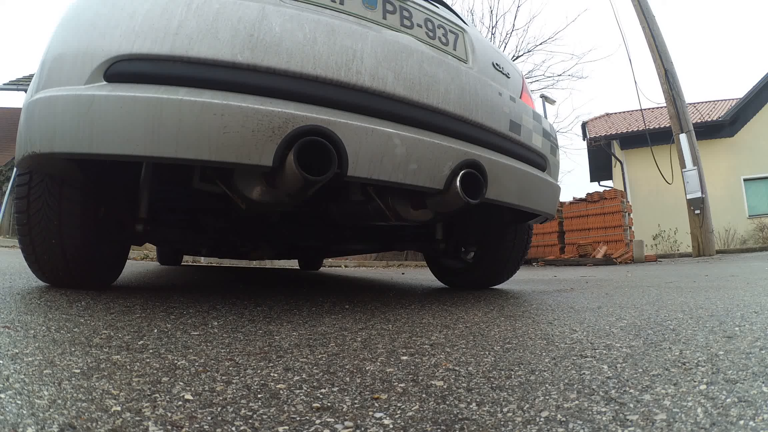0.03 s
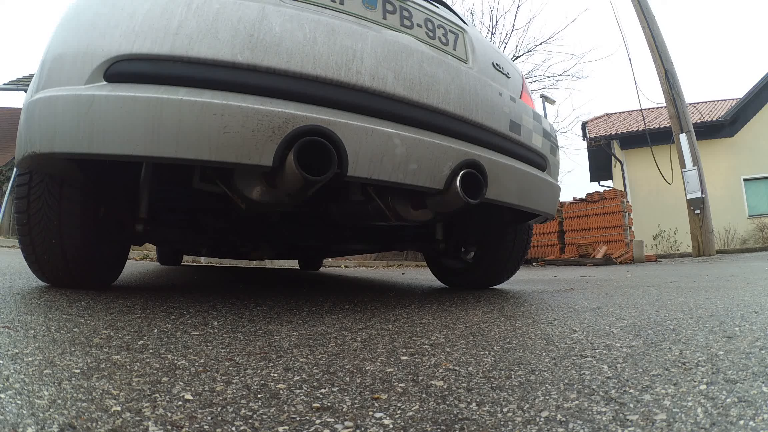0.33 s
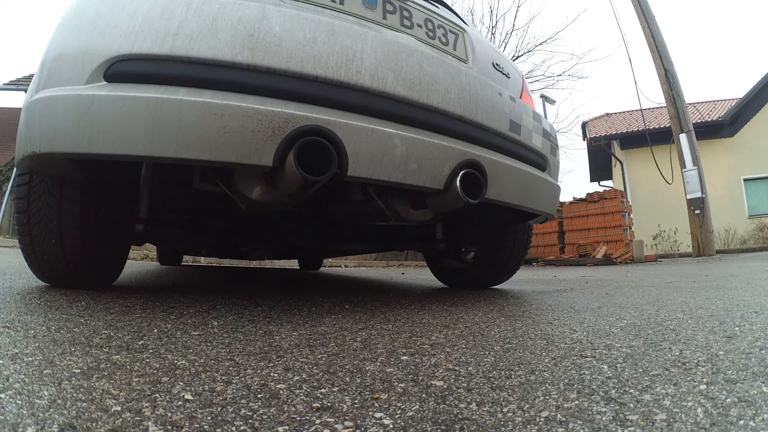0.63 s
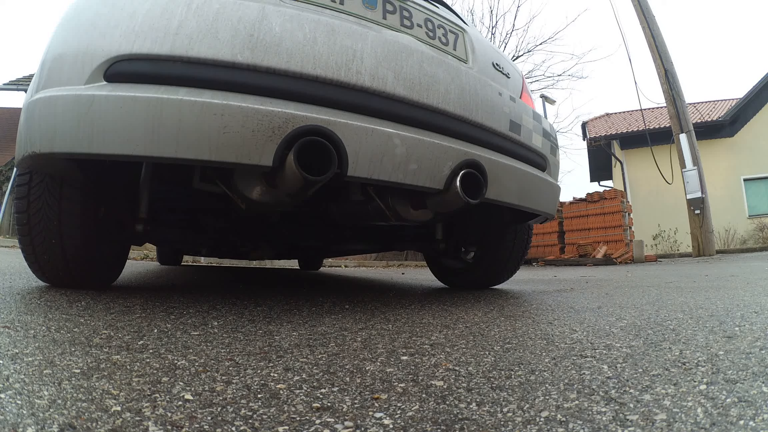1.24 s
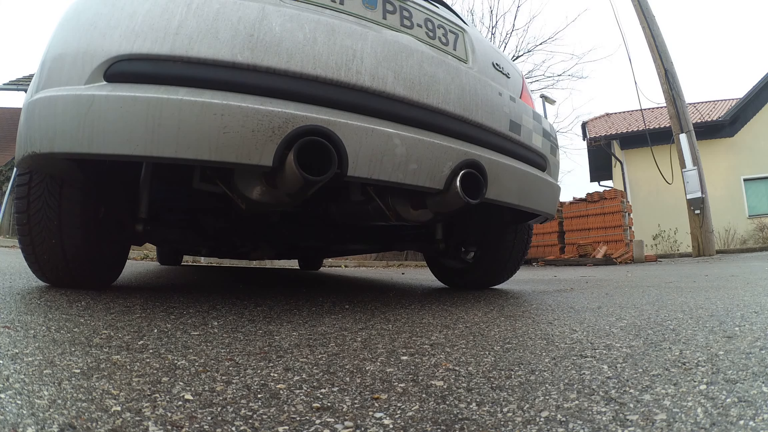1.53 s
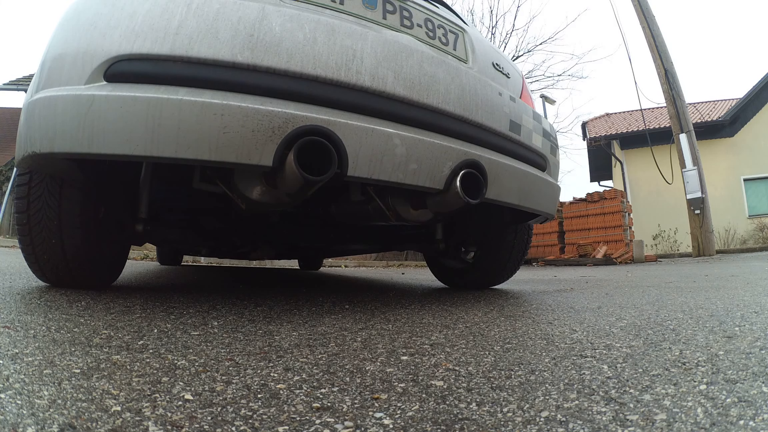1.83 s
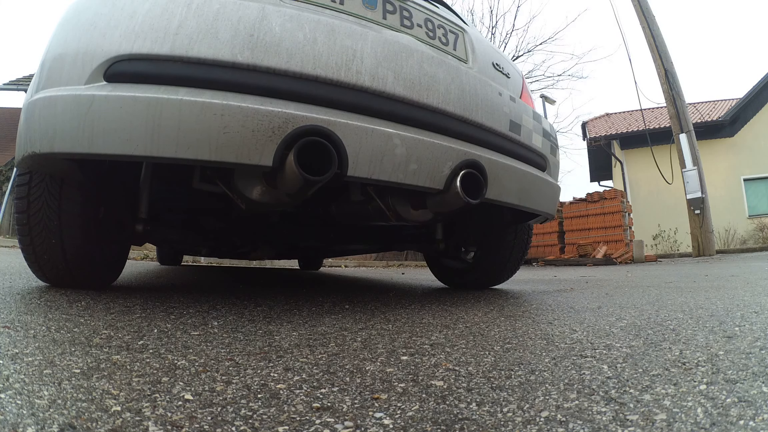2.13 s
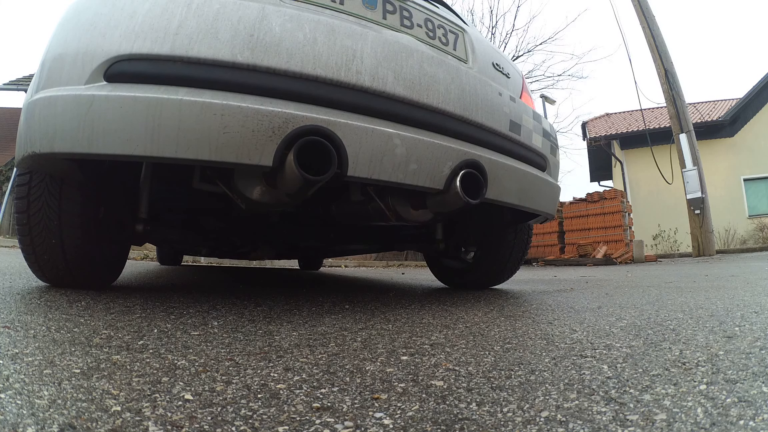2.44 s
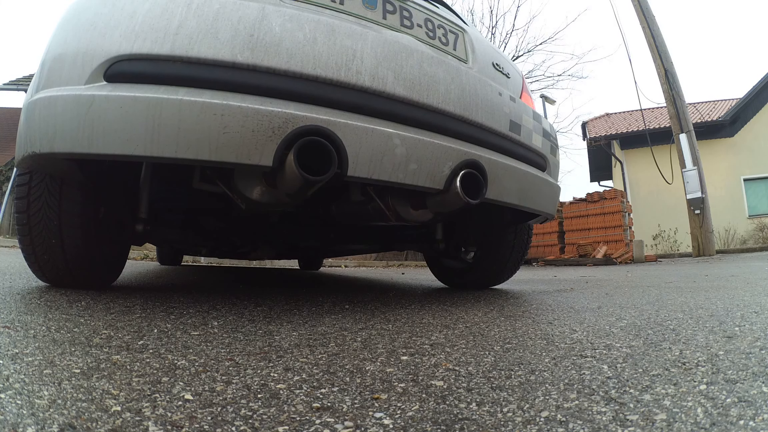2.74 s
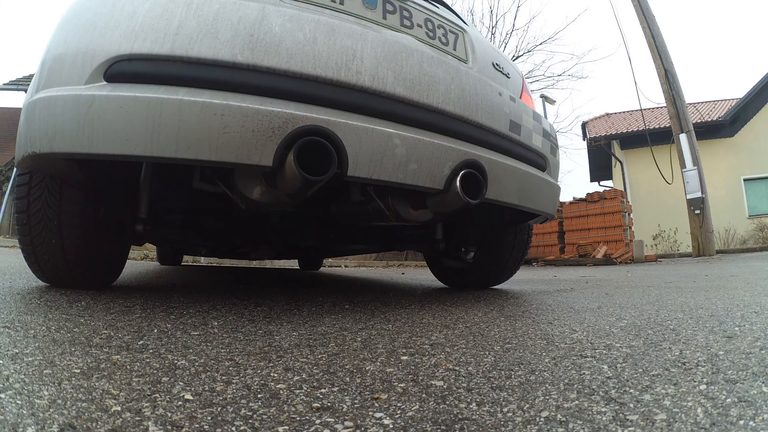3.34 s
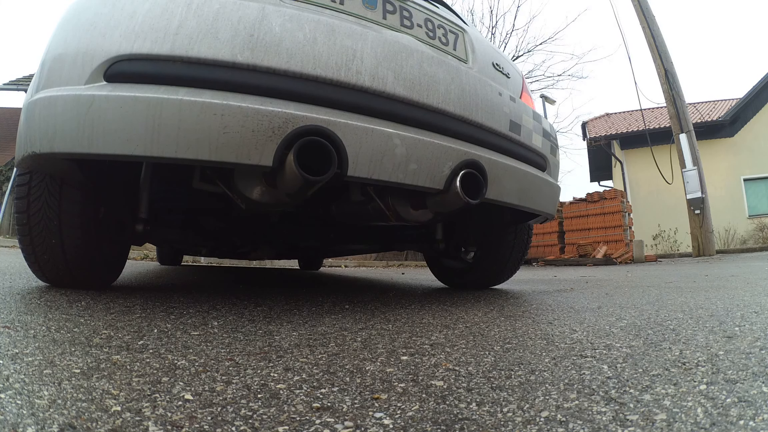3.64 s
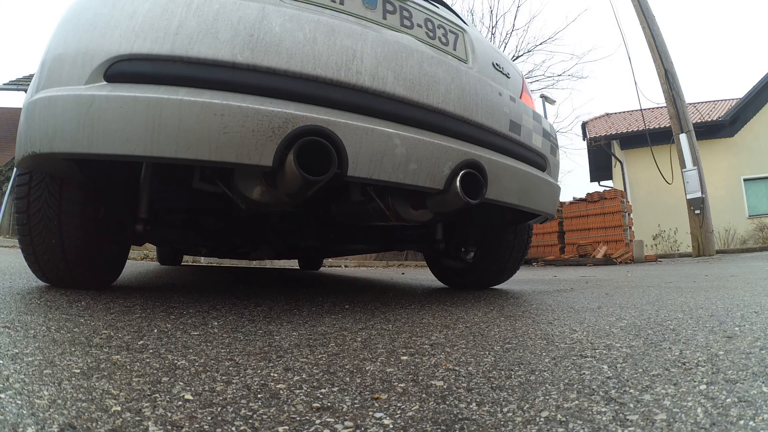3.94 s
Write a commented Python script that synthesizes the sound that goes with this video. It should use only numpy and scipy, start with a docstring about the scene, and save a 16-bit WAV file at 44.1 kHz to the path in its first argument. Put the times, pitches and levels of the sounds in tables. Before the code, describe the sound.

A car starts up, heard close to its exhaust, flaring before a deep fast idle.

```python
"""A four-cylinder petrol car starts from cold, heard from the asphalt just behind its twin tailpipes.
First, faint electrical interference ticks in the recorder. From about 1.5 s the starter's teeth drive
the housing into resonance and unfired cylinders chuff. At 2.15 s the engine catches: gas pulses excite
the silencer and pipes, and the first firings overload the recorder. The revs flare, stumble briefly as
the throttle closes, and settle into a booming fast idle."""
import sys
import numpy as np
from scipy import signal
from scipy.io import wavfile

SR = 44100
rng = np.random.default_rng(int(sys.argv[2]) if len(sys.argv) > 2 else 0)


def unload_audio(sound):
    """Save the sound as a 16-bit wav file, at the path given as the first command line argument."""
    columns = np.transpose(np.atleast_2d(sound))
    # keep every value between -1 and 1, then stretch to whole-number steps
    steps = np.round(np.clip(columns, -1, 1) * 32767)
    wavfile.write(sys.argv[1], SR, steps.astype(np.int16))


N = 176400
TIME = np.arange(N) / SR
FIRST_FIRING_S, FLARE_END_S = 2.151, 2.72


def amp(db):
    """Decibels to amplitude ratio."""
    return 10 ** (np.asarray(db) / 20)


def unit(x):
    """Normalisation to rms 1."""
    return x / np.sqrt(np.mean(x ** 2) + 1e-20)


def idle_rms(x):
    """Rms fluctuation over the last second, when the engine idles."""
    return np.std(x[-SR:])


def curve(table, column=1, t=TIME):
    """Linear interpolation of one table column over time."""
    rows = np.array(table)
    return np.interp(t, rows[:, 0], rows[:, column])


def response(spectrum, size=16384):
    """Minimum-phase impulse response: the phase is the Hilbert transform of the log gain."""
    hz, db = np.transpose(spectrum)
    bin_hz = abs(np.fft.fftfreq(size, 1 / SR))
    log_gain = np.log(amp(np.interp(np.log(bin_hz + 1), np.log(hz + 1), db)))
    return np.fft.ifft(np.exp(np.conj(signal.hilbert(log_gain)))).real[:size // 2]


def colour(x, spectrum):
    """Linear filtering by convolution."""
    return signal.fftconvolve(x, response(spectrum))[:N]


def noise(spectrum):
    """Filtered white noise of rms 1."""
    return unit(colour(rng.standard_normal(N), spectrum))


def wander(per_s):
    """Random modulation: straight lines between Gaussian values."""
    knots = rng.standard_normal(4000)
    return np.interp(TIME * per_s, np.arange(len(knots)), knots)


def impulses(times, sizes):
    """Impulse train with the given times and sizes."""
    samples = np.clip(np.round(np.asarray(times) * SR).astype(int), 0, N)
    return np.bincount(samples, sizes, N + 1)[:N]


def add(mix, s, sound):
    """Superposition of a sound starting at s seconds."""
    part = mix[round(s * SR):][:len(sound)]
    part += sound[:len(part)]


# Engine speed. Each row: time in seconds, firings per second.
FIRING_RATE = [(2.16, 18.27), (2.23, 37.94), (2.3, 51.12), (2.38, 61.5), (2.48, 65.54), (2.56, 65.28),
               (2.63, 53.66), (2.69, 52.59), (2.76, 43.85), (2.9, 44.52), (3.1, 45.27), (3.3, 46.17),
               (3.5, 46.06), (3.66, 44.17), (4.0, 45.78)]
# Cylinders in firing order. Each row: boom in dB, rasp in dB, extra travel to the tailpipe in ms.
CYLINDERS = [(0.9, -0.5, 0.089), (0, 0.5, 0.84), (1.1, -5.5, 0.11), (0.24, 0.5, 1.05)]
# Exhaust pulse strength. Each row: time in seconds, level in dB.
PULSE_LEVEL = [(2.15, -3), (2.2, -3.5), (2.24, -3.5), (2.3, -4), (2.36, -9.5), (2.5, -9), (2.63, -10.5),
               (2.7, -10.5), (2.8, -9.5), (3.4, -10.5), (4, -9.5)]
# Uneven combustion. Each row: time in seconds, spread between firings in dB.
PULSE_SPREAD = [(2.2, 1), (2.32, .5), (2.53, .4), (2.57, 1.5), (2.74, 1.5), (2.82, .3), (4, .25)]
# Weak burns as the throttle closes. Each row: time in seconds, level in dB against a normal firing.
STUMBLES = [(2.555, -3), (2.586, -2), (2.657, -9), (2.676, -3.5)]


def exhaust(jitter_ms=0.18, rasp_spread_db=0.1, puff_decay_cycles=0.4):
    """Periodic excitation: each firing thumps the silencer, rings the pipes and releases a puff of gas."""
    running = np.clip((TIME - FIRST_FIRING_S) * 200, 0, 1)
    rate = np.maximum(curve(FIRING_RATE), 1)
    cycles = np.cumsum(rate * (TIME >= FIRST_FIRING_S)) / SR  # one cycle per firing
    firings = np.arange(int(cycles[-1]) + 1)
    firing_s = np.searchsorted(cycles, firings, side="right") / SR
    boom_scatter, time_scatter, rasp_scatter = rng.standard_normal((200, 3))[firings].T
    boom_db, rasp_db, travel_ms = np.array(CYLINDERS)[firings % len(CYLINDERS)].T
    pulse_db = curve(PULSE_LEVEL, t=firing_s) + boom_db + boom_scatter * curve(PULSE_SPREAD, t=firing_s)
    for s, db in STUMBLES:
        pulse_db[np.argmin(abs(firing_s - s))] += db
    arrival_s = firing_s + (travel_ms + jitter_ms * time_scatter) / 1000
    fronts = impulses(arrival_s, amp(rasp_db + rasp_spread_db * rasp_scatter))
    puff = np.exp(-(cycles % 1) / puff_decay_cycles)
    tones = silencer_boom(cycles, rate, pulse_db) + pipe_tones(cycles)
    return tones + pipe_rasp(fronts, puff, running) + running * gas_hiss(puff)


# Silencer response. Each row: frequency in Hz, relative gain in dB.
SILENCER = [(10, -36.5), (22, -15), (36, 1.5), (46, 2), (64, 0), (75, 2), (92, -17), (130, -18.5),
            (160, -10), (183, -10), (200, -15), (228, -36.5), (300, -47.5), (600, -95.5)]


def silencer_boom(cycles, rate, pulse_db, pulse_cycles=0.2):
    """Acoustic filtering: the silencer passes only the low harmonics of the blowdown pulses."""
    blowdown = rate * np.sin(np.pi * np.minimum(cycles % 1 / pulse_cycles, 1)) ** 2
    pulses = blowdown * amp(pulse_db)[cycles.astype(int)]
    return colour(pulses, SILENCER) / idle_rms(colour(blowdown, SILENCER))


# Low and high pipe resonances. Each row: frequency in Hz, relative gain in dB.
LOW_PIPE = [(130, -69), (215, -18.5), (260, -5), (295, -8.5), (340, -8.5), (388, 1.5), (420, -5.5),
            (480, -4.5), (525, -18.5), (600, -22), (700, -65), (1200, -49)]
HIGH_PIPE = [(400, -30.5), (570, -9.5), (650, -6.5), (705, -12), (765, 0.5), (815, 0), (850, -7),
             (940, -12), (1020, -12), (1130, -22.5), (1350, -23.5), (1600, -33.5), (2600, -55), (5000, -84)]
# Pipe rasp. Each row: time in seconds, low pipe level in dB, high pipe level in dB.
RASP_LEVEL = [(2.15, -51, -52), (2.172, -46, -43), (2.25, -24.5, -26), (2.36, -28.5, -34.5),
              (2.49, -29.5, -31.5), (2.55, -26.5, -34.5), (2.595, -29.5, -42), (2.645, -29.5, -28),
              (2.675, -30, -37.5), (2.72, -38, -47.5), (2.86, -34, -40.5), (3, -36, -45), (3.4, -35, -45),
              (3.7, -39, -47), (4, -33.5, -44)]


def pipe_rasp(fronts, puff, running, steady_flow=1.3):
    """Air-column resonance: pressure fronts and turbulent gas ring the pipes."""
    out = np.zeros(N)
    for pipe, turbulence_db, column in (LOW_PIPE, 2.5, 1), (HIGH_PIPE, 5, 2):
        gas = (steady_flow + puff) * rng.standard_normal(N)
        turbulence = amp(turbulence_db) * running * gas / idle_rms(gas)
        ringing = colour(fronts / idle_rms(fronts) + turbulence, pipe)
        out += amp(curve(RASP_LEVEL, column)) * ringing / idle_rms(ringing)
    return out


# Engine orders. Each row: approximate multiple of the firing rate, idle level in dB, full flare in dB.
ORDERS = [(4, -71, -26.5), (5, -50, -37), (6, -47.5, -23.5), (7, -52, -42), (7.5, -56, -46),
          (8.5, -42, -36), (9.25, -50, -36), (10.5, -48, -41), (12, -55.5, -36.5), (13, -53, -42),
          (14.5, -55.5, -52), (15.5, -70, -41), (16.69, -51.5, -60), (17.63, -54, -46), (22.56, -58, -62)]
# How freely the pipes sing in the flare. Each row: time in seconds, share of full amplitude from 0 to 1.
SINGING = [(2.3, 0), (2.41, 0.03), (2.445, 0.73), (2.5, 0.89), (2.545, 0.4), (2.57, 0)]


def pipe_tones(cycles, waver_rad=0.25):
    """Harmonics of the four-firing cycle follow the engine speed, loudest at the top of the flare."""
    singing = curve(SINGING)
    idling = np.interp(TIME, [SINGING[-1][0], FLARE_END_S], [0, 1])
    out = np.zeros(N)
    for multiple, idle_db, flare_db in ORDERS:
        order = round(multiple * 4) / 4
        phase = 2 * np.pi * order * cycles + waver_rad * wander(per_s=9)
        out += (idling * amp(idle_db) + singing * amp(flare_db)) * np.sqrt(2) * np.sin(phase)
    return out


# Gas hiss under load and at idle. Each row: frequency in Hz, relative level in dB.
LOAD_HISS = [(700, -25), (1150, 2), (1700, -3), (2400, -4.5), (2900, 2.5), (3900, 1), (4900, -1),
             (7000, -1.5), (8500, -3), (10100, -10), (12200, -12), (15000, -18), (16500, -36)]
IDLE_HISS = [(700, -20), (1100, 2.5), (1380, 7.5), (1480, 0.5), (1600, 4.5), (1800, -0.5), (2100, 2.5),
             (2380, -5.5), (2800, 0.5), (3100, -3), (3900, -2), (4500, -5.5), (5600, -4.5), (7000, -7),
             (8500, -10.5), (10000, -15), (15000, -24.5)]
# Strength of the hiss. Each row: time in seconds, level in dB.
HISS_LEVEL = [(2.15, -42), (2.172, -36.5), (2.28, -33), (2.36, -39), (2.43, -42), (2.52, -41.5), (2.6, -45),
              (2.67, -47), (2.77, -47.5), (2.85, -44.5), (2.95, -48.5), (3.15, -48.5), (3.35, -49.5),
              (3.7, -50), (4, -49)]


def gas_hiss(puff, pulsing=0.15, flicker_db=1.44):
    """Turbulent flow noise pulses with each puff and changes colour as the load falls."""
    load = np.interp(TIME, [FIRST_FIRING_S, FLARE_END_S], [1, 0])
    hiss = np.sqrt(load) * noise(LOAD_HISS) + np.sqrt(1 - load) * noise(IDLE_HISS)
    level_db = curve(HISS_LEVEL) + flicker_db * wander(per_s=82)
    return hiss * unit(1 + pulsing * puff) * amp(level_db)


# Unfired cylinders while cranking, then late burns. Each row: start in seconds, peak level in dB.
CHUFFS = [(1.6, -25), (1.7, -22.5), (1.751, -26.5), (1.798, -30), (1.85, -32), (1.909, -19), (1.954, -29),
          (2.001, -29.5), (2.071, -20), (2.119, -24.5), (2.561, -4), (2.595, -11), (2.619, -9),
          (2.688, -11), (2.726, -7.5)]
# Spectrum of a chuff. Each row: frequency in Hz, relative level in dB.
CHUFF_SPECTRUM = [(6, -14.5), (19, 6), (32, -2), (48, -4.5), (68, -4.5), (85, -20), (120, -37), (300, -69),
                  (1500, -100)]


def chuffs():
    """Impulse response: single slugs of gas push through the silencer as deep thuds."""
    start_s, db = np.transpose(CHUFFS)
    chuff = response(CHUFF_SPECTRUM)
    return signal.fftconvolve(impulses(start_s, amp(db)), chuff / chuff.max())[:N]


# Starter effort. Each row: time in seconds, gear level in dB, whirr level in dB.
STARTER_LEVEL = [(1.54, -70, -78), (1.55, -46, -45), (1.6, -35.5, -47), (1.625, -44.5, -54.5),
                 (1.74, -42, -53), (1.79, -48, -50.5), (1.85, -51, -49.5), (1.868, -40.5, -43),
                 (1.93, -38, -52.5), (1.99, -49.5, -47), (2.02, -51, -50), (2.07, -36, -46),
                 (2.11, -39.5, -50.5), (2.15, -39, -42), (2.22, -32, -57), (2.3, -84, -62)]
# Starter and engine housing modes. Each row: frequency in Hz, relative level in dB, T60 in seconds.
HOUSING_MODES = [(370, -25, 0.039), (547, 2, 0.17), (637, -2, .1), (786, 0.5, 0.086), (1003, -4, 0.18),
                 (1093, -7, .05), (1340, -15, 0.079), (1594, 6.5, 0.017), (1975, -7.5, 0.068),
                 (2835, -9, 0.035), (3240, -10, 0.054), (4280, -15, 0.067)]
# Gear churn and treble whirr. Each row: frequency in Hz, relative level in dB.
CHURN = [(90, 0), (160, -11), (220, 4.5), (270, -7), (315, 1.5), (520, -1), (575, -12), (640, 3.5),
         (695, -6), (790, 0.5), (1100, 0), (1280, -6), (1400, -8), (1600, -2.5), (1800, -10.5), (2500, -18),
         (4000, -40)]
WHIRR = [(1350, -22), (2300, -4), (2890, -4), (3950, -1), (4590, -6), (5120, 0), (5450, -7.5), (6790, -2.5),
         (8330, -6.5), (15000, -26)]


def starter(teeth_per_s=400, rattle_db=-7.5, churn_db=-3, flicker_db=0.99):
    """Forced vibration: teeth rattle the housing, swelling at each compression; the gears whirr above."""
    t = TIME[:SR // 4]
    ring = sum(amp(db - 60 * t / t60) * np.sin(2 * np.pi * hz * t) for hz, db, t60 in HOUSING_MODES)
    teeth_passed = np.floor(np.cumsum(teeth_per_s * (1 + 0.12 * wander(per_s=25))) / SR)
    impacts = np.diff(teeth_passed, prepend=0) * rng.exponential(1, N)
    force = np.diff(impacts, prepend=0) + 0.1 * impacts  # differencing brightens each impact
    rattle = unit(signal.fftconvolve(force, ring)[:N])
    gears = amp(rattle_db) * rattle + amp(churn_db) * noise(CHURN)
    whirr = noise(WHIRR) * amp(flicker_db * wander(per_s=200))
    out = gears * amp(curve(STARTER_LEVEL, 1)) + whirr * amp(curve(STARTER_LEVEL, 2))
    return out * (TIME > STARTER_LEVEL[0][0])


# Starter drive squeals. Each row: centre in seconds, length in seconds, frequency in Hz, level in dB.
SQUEALS = [(1.67, .07, 797, -50), (1.69, .07, 3260, -51.5), (1.75, 0.14, 387, -50),
           (2.002, 0.045, 4400, -54), (2.033, 0.026, 1260, -41.5), (2.14, 0.039, 1650, -45)]


def squeals(waver=0.0204):
    """Frequency modulation: short wavering tones swell and fade as the starter strains."""
    out = np.zeros(N)
    for s, length, hz, db in SQUEALS:
        swell = np.cos(np.pi * np.clip((TIME - s) / length, -0.5, 0.5))
        pitch_hz = hz * (1 + waver * wander(per_s=300))
        out += amp(db) * swell * np.sqrt(2) * np.sin(2 * np.pi * np.cumsum(pitch_hz) / SR)
    return out


# The pinion engages, then the drivetrain knocks. Each row: start in seconds, level in dB, decay in seconds.
CLACKS = [(1.558, -33, 0.0075), (1.585, -35.5, 0.0086), (2.026, -33, 0.017), (2.685, -35, 0.013),
          (2.732, -39.5, 0.011)]
# Spectrum of a metallic clack. Each row: frequency in Hz, relative level in dB.
CLACK_SPECTRUM = [(300, -15), (700, 8.5), (1300, -2.5), (2300, 0.5), (3300, -0.5), (7000, -3.5),
                  (10000, -12), (15000, -23)]


def clacks(attack_s=0.0014):
    """Damped impacts: each knock under the car is a noise burst that decays exponentially."""
    envelope = np.zeros(N)
    for s, db, decay_s in CLACKS:
        age = np.maximum(TIME - s, 0)
        envelope += amp(db) * np.minimum(age / attack_s, 1) * np.exp(-age / decay_s)
    return envelope * noise(CLACK_SPECTRUM)


# Single electrical spikes. Each row: start in seconds, width in ms, level in dB.
SPIKES = [(0.152, 0.79, -43), (.1805, 0.14, -49), (0.2252, 1.76, -40), (0.242, 0.14, -47),
          (.532, 1.78, -44), (0.5715, 0.86, -45), (.573, 1.13, -38), (.5765, 0.93, -41), (.58, 1.03, -46),
          (0.584, 1.8, -56), (0.587, .7, -52)]


def interference(period_s=0.06, blip_ms=0.61, blip_db=-50.5):
    """Electrical pickup of square pulses: regular ticks, a stutter, then a slow square wave with blips."""
    def pulse(ms, db):
        return amp(db) * np.clip(ms * SR / 1000 - np.arange(SR // 20), 0, 1)

    out = np.zeros(N)
    for s, ms, db in SPIKES:
        add(out, s, -pulse(ms, db))
    for s in np.arange(0.1205, 0.59, period_s):
        add(out, s, -pulse(ms=0.08, db=-44.5))
    for s in np.arange(0.571, 1.56, period_s):
        add(out, s, -pulse(ms=period_s * 1000 / 2, db=-48.5))
        for delay_s in 0.0128, 0.0268:
            add(out, s + delay_s, pulse(blip_ms * rng.uniform(0.4, 1.7), blip_db))
            if rng.random() < 0.5:
                add(out, s + delay_s + 0.00212, pulse(blip_ms / 2, blip_db))
    return signal.lfilter(*signal.butter(1, 12, "high", fs=SR), out)


# Quiet street. Each row: frequency in Hz, relative level in dB.
STREET_SPECTRUM = [(15, -15), (25, 9), (100, -17), (200, -17.5), (300, -26), (900, -30.5), (1600, -32),
                   (4600, -36), (15000, -37.5)]
# Faint electrical tones. Each row: frequency in Hz, level in dB.
WHINE = [(1001, -89.5), (1502, -84.5)]


def background(street_db=-65, start_s=0.07):
    """Noise floor: broadband street noise with a steady electrical whine."""
    whine = sum(amp(db) * np.sqrt(2) * np.sin(2 * np.pi * hz * TIME) for hz, db in WHINE)
    return (amp(street_db) * noise(STREET_SPECTRUM) + whine) * (TIME > start_s)


def scene():
    """Superposition of the car, the interference and the street in one channel."""
    street = background()
    return (exhaust() + chuffs() + starter() + squeals() + clacks() + interference() + street)[None]


def record(dry, cutoff_hz=15300):
    """Overload: hard clipping flattens the peaks, then a low-pass filter limits the band."""
    low_pass = signal.firwin(511, cutoff_hz, window=("kaiser", 9), fs=SR)
    return signal.oaconvolve(np.clip(dry, -1, 1), low_pass[None], "same")


dry = scene()
out = record(dry)
unload_audio(out)
```